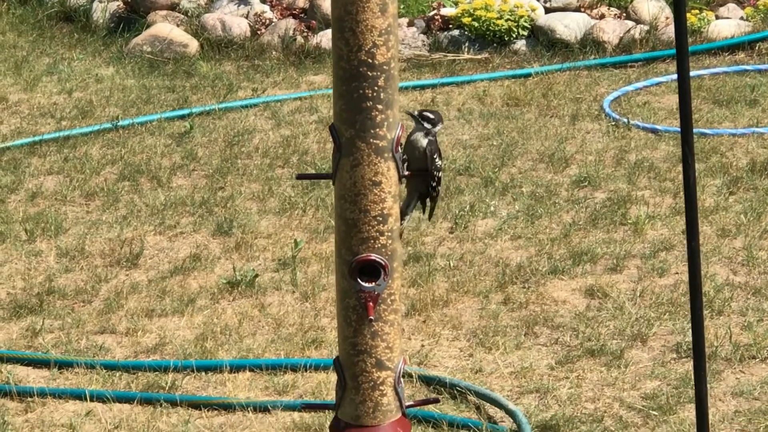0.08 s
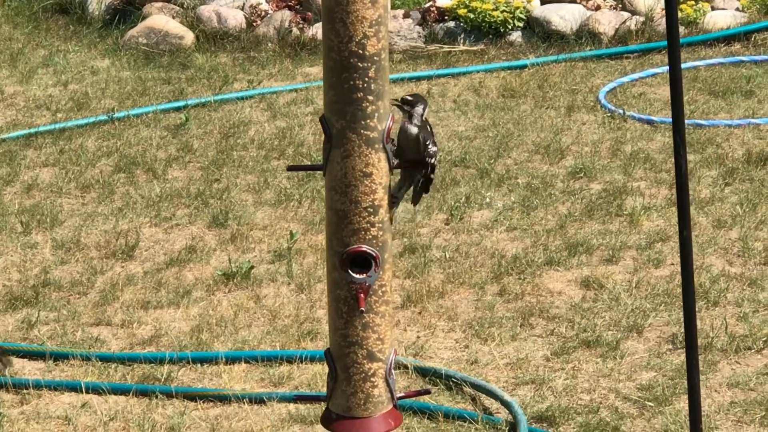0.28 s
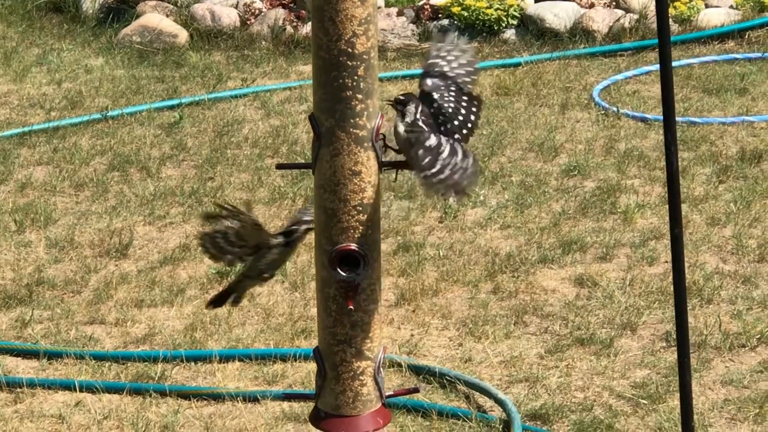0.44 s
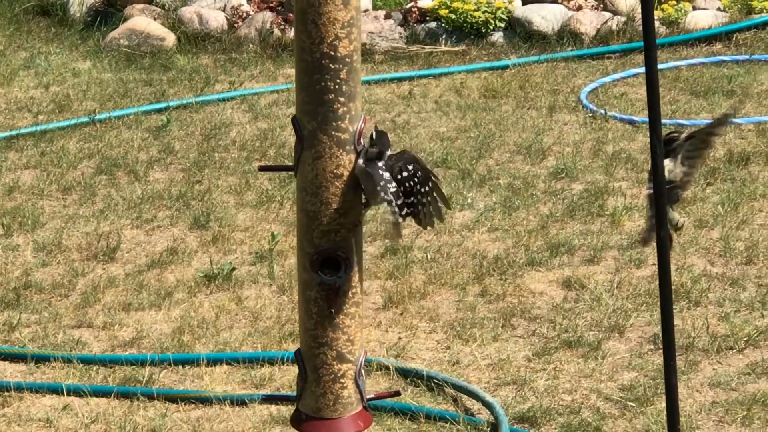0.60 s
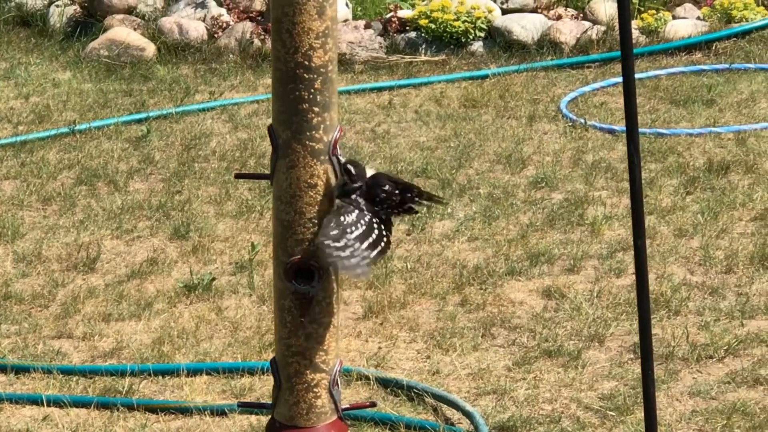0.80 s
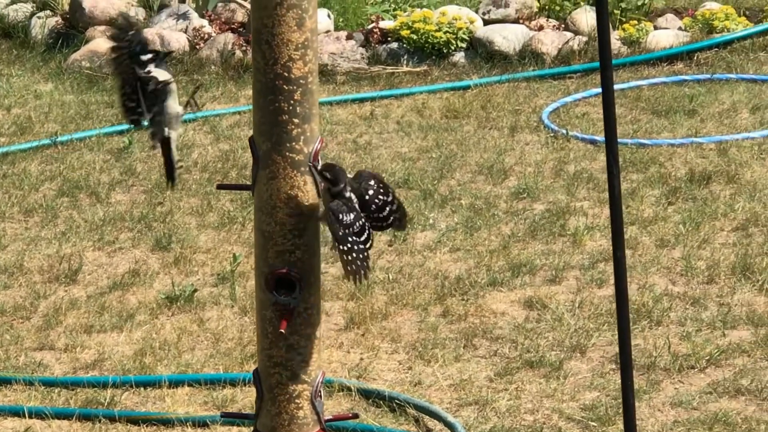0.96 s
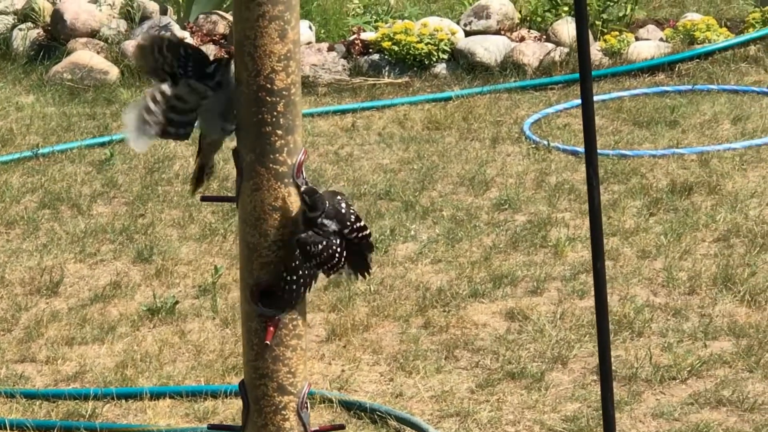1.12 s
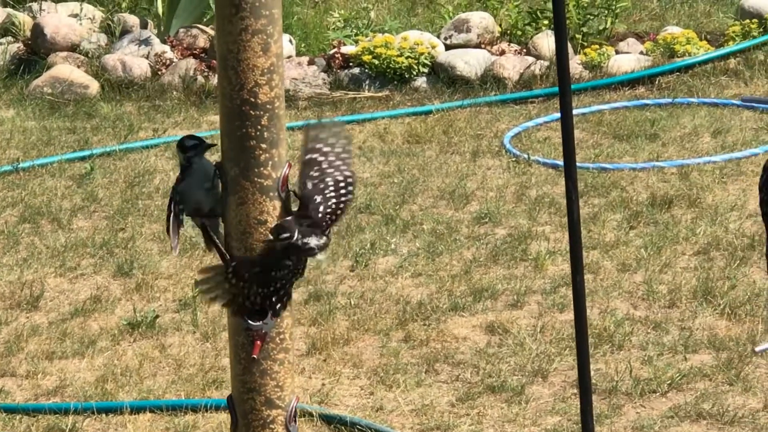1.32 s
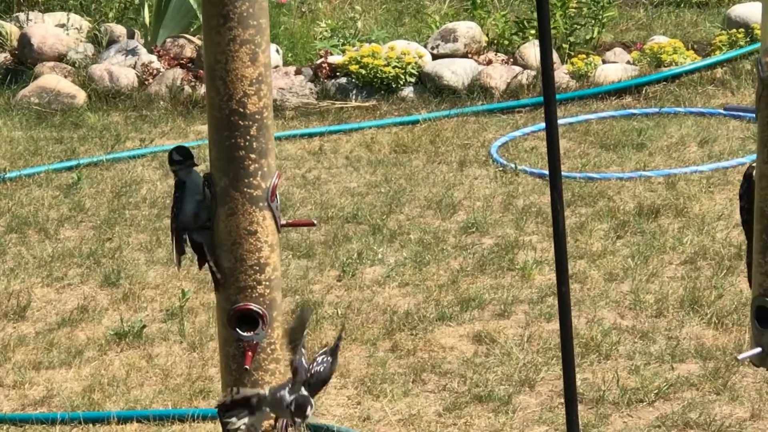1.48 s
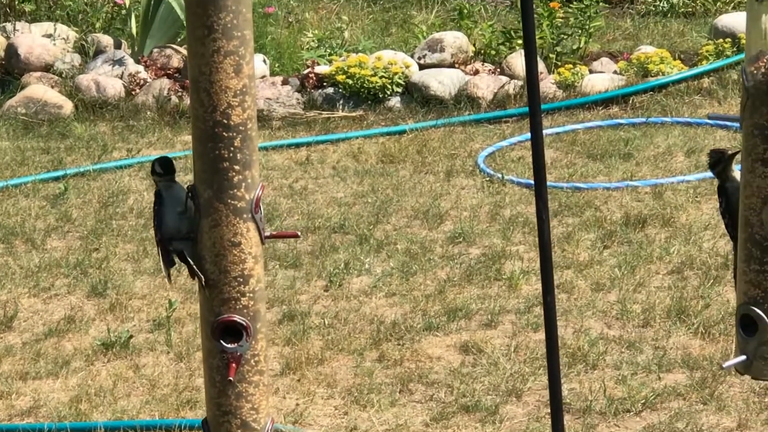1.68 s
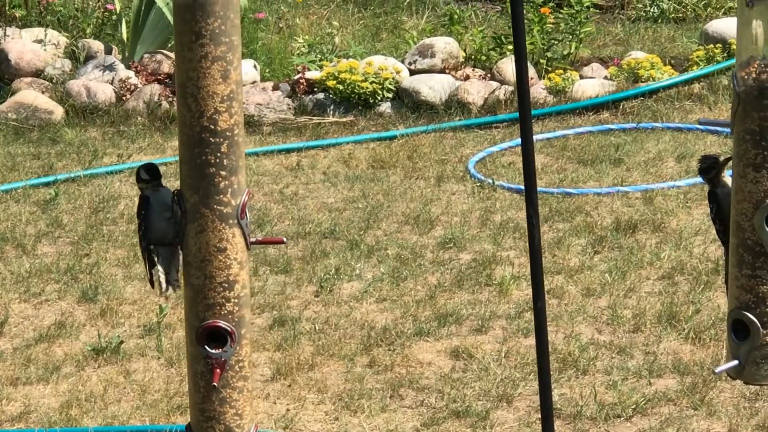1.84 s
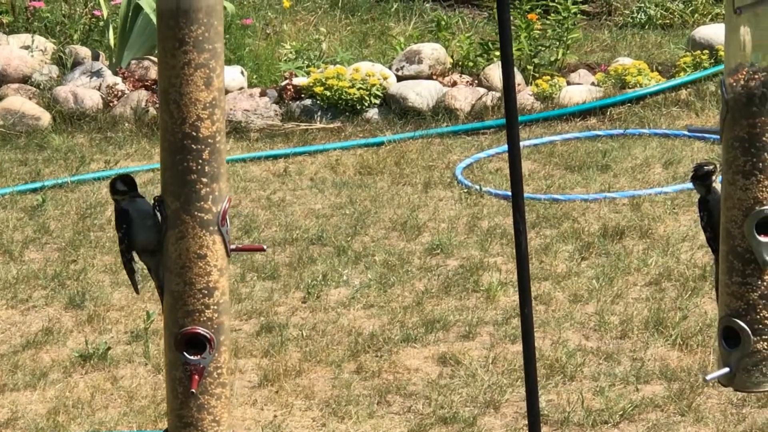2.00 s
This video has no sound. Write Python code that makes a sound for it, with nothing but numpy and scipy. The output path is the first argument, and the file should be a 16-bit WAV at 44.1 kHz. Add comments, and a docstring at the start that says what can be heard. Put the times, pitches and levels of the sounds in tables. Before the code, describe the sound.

Woodpeckers chirp close to the microphone: high, piercing squeaks, each a tiny pip or hoarse rasp turning into a clear note that drops away. Four come from 0.2 to 0.8 seconds, then five from 1.35 to 1.85, closer together near the end. Small bill clicks tick between. A songbird further off whistles a repeating phrase until about 1.4, then fainter birds, over quiet garden hiss.

```python
"""Young woodpeckers chirp close by at a garden feeder: a short pip, a hoarse rasp, then a clear note that drops away.
Pips and notes are harmonic stacks; rasps are shaped noise with wandering tones; fast slides and bill clicks join them.
A songbird further off repeats a phrase of short whistles, each a swept sine; a farther bird's sines are blurred.
Garden echoes are decaying noise tails; light outdoor hiss, a low hum and a blur of far birds lie behind."""
import sys
import numpy as np
from scipy import signal
from scipy.fft import rfft, irfft, next_fast_len
from scipy.io import wavfile
from scipy.ndimage import uniform_filter1d, map_coordinates

SR = 44100
rng = np.random.default_rng(int(sys.argv[2]) if len(sys.argv) > 2 else 0)


def volts_from_db(level):
    """Convert decibel levels to linear amplitude ratios."""
    exponent = np.asarray(level, float) / 20
    return 10 ** exponent


def file_out(sig):
    """Save sig as 16-bit WAV at sys.argv[1]."""
    # one column per channel
    cols = np.atleast_2d(sig).T
    # limit, then scale
    lim = np.clip(cols, -1, 1)
    pcm = np.round(lim * 32767).astype(np.int16)
    wavfile.write(sys.argv[1], SR, pcm)


N = 92610  # samples
ATTACK_S = 0.0008  # onset time constant of notes and pips
BEAK_HZ = 8500  # resonance of the beak
FLUTTER_HZ = 4100  # above this pitch the song flutters more and arrives less directly
BLUR_CENTRE_HZ = 5000  # centre of the far-bird blur and pivot of the foliage scatter


def unit(x):
    """Normalisation: scales a signal to an rms of 1."""
    return x / np.sqrt(np.mean(x ** 2) + 1e-20)


def wobble(n, rate):
    """Random modulation: a smooth curve through normal random knots, rate knots a second."""
    return map_coordinates(rng.standard_normal(int(n * rate / SR) + 4), [np.arange(n) * rate / SR])


def add(out, start_s, x):
    """Superposition: mixes x in at start_s seconds."""
    part = out[round(start_s * SR):][:len(x)]
    part += x[:len(part)]


def sine(pitch):
    """Phase integration: a sine of peak 1 that follows a pitch curve [Hz]."""
    return np.sin(2 * np.pi * np.cumsum(pitch) / SR)


def coloured(n, gain):
    """Spectral shaping: noise of rms 1 with a gain per frequency."""
    m = next_fast_len(n + 2048)
    spectrum = rfft(rng.standard_normal(m)) * gain(np.fft.rfftfreq(m, 1 / SR) + 1)
    return unit(irfft(spectrum, m)[:n])


def tract_loss_db(hz):
    """Source-filter principle: loss away from the beak resonance and below the throat's pass band."""
    beak_db = 8 * abs(np.log2(hz / BEAK_HZ))  # 8 dB per octave
    throat_db = 35 * np.maximum(np.log2(3100 / hz), 0)  # 35 dB per octave below 3100 Hz
    return beak_db + throat_db


def harmonic_stack(pitch, voice):
    """Harmonic series: six partials, each changing level as it slides along the tract's response."""
    one, three, four = voice
    high_step_db = 9  # loss per partial over the 4th
    levels = [one, 0, three, four, four - high_step_db, four - 2 * high_step_db]
    phase = 2 * np.pi * np.cumsum(pitch) / SR
    home = np.median(pitch)
    total = np.zeros(len(pitch))
    for k, db in enumerate(levels, 1):
        slide_db = tract_loss_db(k * home) - tract_loss_db(k * pitch)
        waver_db = 0.7 * wobble(len(pitch), 127)
        audible = k * pitch < SR / 2
        total += np.sqrt(2) * volts_from_db(db + slide_db + waver_db) * audible * np.sin(k * phase)
    return total


# unsteady tones inside a rasp: (multiple of the centre [ratio], level [dB])
STRANDS = [(1, 1.5), (.56, -7), (1.4, -11), (.8, -4.5)]


def hoarse_breath(n, hz0, hz1):
    """Turbulent noise: fluttering breath around a centre, with broken, wandering tones inside it."""
    width_octaves = 0.75
    middle = (hz0 + hz1) / 2
    sound = coloured(n, lambda f: np.exp(-abs(np.log2(f / middle) / width_octaves)))
    centre = np.linspace(hz0, hz1, n)
    for multiple, db in STRANDS:
        breaks = volts_from_db(db + 5 * wobble(n, 400))
        wander = 1 + 0.035 * wobble(n, 250)  # share of pitch
        sound += breaks * sine(multiple * centre * wander)
    return unit(sound) * volts_from_db(2 * wobble(n, 700))


# clear notes: (start [s], end [s], pitch [Hz], opening bend [Hz], sag [Hz/s], drop time [s],
# level of the 2nd partial at mid-note [dB])
NOTES = [(0.207, 0.241, 4110, 300, -1000, 0.0042, -37), (0.35, 0.39, 4180, -700, 9016, 0.0031, -36.5),
         (0.538, 0.575, 4000, -800, 509, 0.0038, -35), (0.7422, 0.771, 3953, -450, 3013, 0.0047, -49),
         (1.386, 1.4185, 3680, 600, 2000, 0.0055, -48.5), (1.5405, 1.5777, 3770, 900, 2496, 0.0048, -38),
         (1.6612, 1.688, 3830, 600, 3993, 0.0032, -38.5), (1.7468, 1.7755, 3590, 450, -2500, .0044, -38.5),
         (1.825, 1.8519, 3720, 500, 500, 0.0046, -40.5)]
# voice of each clear note: (1st, 3rd, 4th partial over the 2nd [dB], swell to the middle [dB])
VOICES = [(-7.5, -18.5, -50, 0), (-8, -14, -27, 1), (-8.5, -3.5, -23, 5.5), (4.5, 9, -4, 6),
          (-4.5, -4.5, -16, 3), (-9.5, -3, -15, 5.5), (-9, -6, -17, 3), (-9, -10, -24, 5),
          (-7.5, -10.5, -27, 0.5)]


def clear_notes():
    """Frequency modulation: a harmonic note that loses level and turns hoarse as its pitch drops."""
    from_below_s, from_above_s = 0.00291, 0.001  # time constants of the opening bend
    drop_hz, drop_db, hoarse_db = 1423, 12, -15
    gulp_hz, gulp_s, gulp_db = 2050, 0.006, -25  # a low blip closes each note
    out = np.zeros(N)
    for (start, end, hz, bend, sag, drop_s, db), (*voice, swell_db) in zip(NOTES, VOICES):
        length = end - start
        t = np.arange(round((length + 0.0084) * SR)) / SR
        drop = np.exp((t - length) / drop_s)  # reaches 1 at the listed end and grows on past it
        opening = bend * np.exp(-t / (from_below_s if bend < 0 else from_above_s))
        pitch = np.maximum(hz + opening - sag * t - drop_hz * drop, 1200)
        swell = volts_from_db(db - swell_db * (2 * t / length - 1) ** 2)
        level = (1 - np.exp(-t / ATTACK_S)) * swell
        tone = volts_from_db(-drop_db * drop) * harmonic_stack(pitch, voice)
        hoarse_level = volts_from_db(hoarse_db) * drop * np.exp(1 - drop)
        breath = hoarse_level * hoarse_breath(len(t), BEAK_HZ, BEAK_HZ)
        add(out, start, level * (tone + breath))
        n = round(gulp_s * SR)
        gulp = np.hanning(n) * np.sin(2 * np.pi * gulp_hz * t[:n])
        add(out, end, volts_from_db(db + gulp_db) * gulp)
    return out


# pips: (start [s], length [s], pitch [Hz], bend by the end [Hz], level of the 2nd partial [dB])
PIPS = [(0.183, 0.0043, 3240, -100, -48), (0.323, 0.0093, 3326, -450, -45.5),
        (0.509, 0.012, 3216, -300, -43.5), (1.353, 0.0065, 3290, 1102, -49.5),
        (1.516, 0.0058, 3140, -300, -48), (1.643, 0.006, 3130, -900, -51)]
# voice of the pips: (1st, 3rd, 4th partial over the 2nd [dB])
PIP_VOICE = (-10, -6, -12)


def pips():
    """Amplitude envelope: a brief harmonic stack with a sharp onset and a rounded close."""
    out = np.zeros(N)
    for start, length, hz, bend, db in PIPS:
        t = np.arange(round(length * SR)) / SR
        onset = 1 - np.exp(-t / ATTACK_S)
        close = np.cos(np.pi / 2 * t / length) ** 0.5
        pitch = hz + bend * (t / length) ** 2
        add(out, start, volts_from_db(db) * onset * close * harmonic_stack(pitch, PIP_VOICE))
    return out


# rasps: (start [s], end [s], centre at start [Hz], centre at end [Hz], start level [dB], end level [dB])
RASPS = [(0.184, 0.205, 7600, 8200, -54, -49), (0.331, .35, 7500, 8140, -52.5, -52),
         (0.516, 0.539, 7200, 8250, -52.5, -47.5), (0.714, 0.728, 6000, 5800, -63, -59),
         (.732, 0.741, 7800, 8160, -63, -54.5), (1.359, 1.382, 7130, 6700, -51, -51.5),
         (1.358, 1.383, 11500, 10530, -46.5, -56), (1.518, 1.543, 6480, 7460, -55, -48),
         (1.646, 1.661, 6720, 7300, -52, -46), (1.734, 1.747, 6930, 7500, -57, -44),
         (1.812, 1.824, 7100, 7100, -64, -58)]


def rasps():
    """Turbulent noise: short bursts of hoarse breath with gliding tones and level."""
    out = np.zeros(N)
    for start, end, hz0, hz1, db0, db1 in RASPS:
        n = round((end - start) * SR)
        level = volts_from_db(np.linspace(db0, db1, n)) * signal.windows.tukey(n, 0.15)
        add(out, start, level * hoarse_breath(n, hz0, hz1))
    return out


# fast falling slides, most leading into a clear note, and one soft falling pip:
# (start [s], length [s], from [Hz], to [Hz], level of the 2nd partial [dB])
SWOOPS = [(0.2, 0.008, 7230, 4170, -66.5), (0.535, 0.0063, 4240, 2970, -62), (.71, .018, 3480, 2950, -71),
          (1.381, 0.0068, 5500, 3900, -63), (1.537, .005, 5850, 3920, -66.5),
          (1.662, 0.006, 6340, 4000, -63.5), (1.741, 0.006, 6400, 3780, -67),
          (1.824, 0.0045, 5400, 3900, -69)]


def swoops():
    """Linear frequency sweep: falling harmonic slides, strongest in the 1st partial."""
    out = np.zeros(N)
    for start, length, hz0, hz1, db in SWOOPS:
        pitch = np.linspace(hz0, hz1, round(length * SR))
        add(out, start, volts_from_db(db) * np.hanning(len(pitch)) ** 0.5 * harmonic_stack(pitch, (12, -3, -12)))
    return out


# bill clicks: (time [s], level at onset [dB])
CLICKS = [(.517, -49), (.72, -49), (1.127, -59), (1.479, -52), (1.646, -46), (1.7305, -45), (1.810, -51)]


def bill_clicks():
    """Impulsive excitation: dry bursts of band-shaped noise that decay exponentially."""
    t60, centre_hz = 0.0051, 4000  # s, Hz
    t = np.arange(SR // 50) / SR
    out = np.zeros(N)
    for start, db in CLICKS:
        burst = coloured(len(t), lambda f: np.exp(-np.log2(f / centre_hz) ** 2 / 2))
        add(out, start, volts_from_db(db - 60 * t / t60) * burst)
    return out


# shapes of the song's notes: (time after note start [s], pitch [Hz], level [dB])
RISE = [(0, 3640, -66), (.012, 3700, -54), (.021, 3850, -50), (.03, 3900, -48), (.04, 4010, -49),
        (.052, 4520, -56), (.062, 4900, -54), (.075, 5000, -66)]
FALL = [(0, 4000, -66), (.009, 3990, -52), (.029, 3850, -48), (.045, 3610, -49), (.058, 3330, -55),
        (.072, 3240, -55), (.078, 3260, -63), (.13, 3280, -69)]
DIVE = [(0, 5400, -68), (.008, 5380, -59), (.016, 5200, -61), (.028, 4350, -61), (.034, 4080, -50),
        (.042, 3880, -47), (.052, 3740, -50), (.059, 3700, -68)]
HIGH = [(0, 5350, -70), (.012, 5500, -64), (.02, 5800, -60), (.04, 5930, -58), (.055, 5950, -61),
        (.064, 5940, -70), (.085, 5920, -58), (.108, 5940, -68)]
DIP = [(0, 5420, -68), (.009, 5400, -57), (.02, 4650, -59), (.035, 4290, -59), (.048, 4560, -57),
       (.06, 4850, -57), (.068, 4800, -64), (.085, 4750, -68)]
LIFT = [(0, 5350, -68), (.016, 5600, -61), (.038, 5680, -58), (.046, 5680, -70)]
# the song: (note shape, list of (start [s], gain [dB], sung for [s]))
SONG = [(RISE, [(.179, -3, .04), (.734, -1, .075), (1.298, -1, .075)]), (FALL, [(.285, -1, .065),
        (.857, -1, .13)]), (DIVE, [(.42, 0, .059), (.997, 0, .059)]), (LIFT, [(.487, -1, .046)]),
        (HIGH, [(1.06, -1, .108)]), (DIP, [(.042, -14, .085), (.601, 0, .085), (1.172, 0, .085)])]


def songbird():
    """Frequency modulation of a pure tone: whistles drawn from six shapes, most sung more than once."""
    out = np.zeros(N)
    for note, times in SONG:
        at, hz, db = np.transpose(note)
        for start, gain_db, length in times:
            t = np.arange(round(length * SR)) / SR
            pitch = uniform_filter1d(np.interp(t, at, hz), size=150)
            waver_db = 1 + 0.0025 * np.maximum(pitch - FLUTTER_HZ, 0)  # deeper at high pitch
            level = volts_from_db(np.interp(t, at, db) + gain_db + waver_db * wobble(len(t), 236))
            level = level * signal.windows.tukey(len(t), 0.1)
            add(out, start, np.sqrt(2) * level * sine(pitch))
    return out


# far bird: (start [s], length [s], pitch [Hz], slide [Hz/s], level before blurring [dB])
FAR = [(1.58, .06, 4200, -5000, -66), (1.69, .04, 4700, -3000, -64), (1.9, .05, 4700, -14000, -70),
       (2.02, .055, 5200, -12000, -65), (2.01, .09, 6100, 500, -68), (1.88, .08, 2250, 100, -74),
       (2.01, .08, 2250, 100, -75)]


def far_bird():
    """Random amplitude modulation: faint whistles smeared by distance."""
    out = np.zeros(N)
    for start, length, hz, slide, db in FAR:
        t = np.arange(round(length * SR)) / SR
        blur = wobble(len(t), 500)
        envelope = volts_from_db(db) * np.sqrt(2) * np.hanning(len(t)) ** 0.5
        add(out, start, envelope * blur * sine(hz + slide * t))
    return out


def garden_echo(x, t60, gap_s):
    """Diffuse reverberation: scatter from fences and bushes, drawn anew every twelfth of a second."""
    t, out, step = np.arange(SR // 2) / SR, np.zeros(N), SR // 12
    for i in range(0, N, step):
        build_up = 1 - np.exp(-(t / gap_s) ** 2)
        tail = rng.standard_normal(len(t)) * volts_from_db(-60 * t / t60) * build_up
        add(out, i / SR, signal.fftconvolve(x[i:i + step], tail / np.linalg.norm(tail)))
    return out


def near_field(near):
    """Superposed paths: direct sound, one delayed ground reflection and garden echoes."""
    ground = np.pad(near, (round(0.0034 * SR), 0))[:N]
    return near + volts_from_db(-12) * ground + volts_from_db(-17.5) * garden_echo(near, t60=0.33, gap_s=0.0041)


def through_foliage(song):
    """Frequency-dependent scattering: high notes scatter more and arrive less directly."""
    hz = np.clip(np.fft.rfftfreq(N, 1 / SR), 2000, 7000)
    scatter_db = 14 * np.log2(hz / BLUR_CENTRE_HZ)  # 14 dB per octave
    shade_db = 0.0012 * np.maximum(hz - FLUTTER_HZ, 0)  # 0.0012 dB per Hz
    bright = irfft(rfft(song) * volts_from_db(scatter_db), N)
    direct = irfft(rfft(song) * volts_from_db(-shade_db), N)
    echo = volts_from_db(-8) * garden_echo(song, t60=0.45, gap_s=0.012)
    leaves = volts_from_db(-3) * garden_echo(bright, t60=0.1, gap_s=0.003)  # quick scatter
    return direct + echo + leaves


# blur of far birds: (time [s], level [dB])
CHATTER = [(0, -108), (.4, -68), (.8, -65.5), (1.2, -84), (1.6, -69), (2.1, -69)]


def far_chatter():
    """Band-shaped noise: many far birds merge into a blur that swells and fades."""
    width_octaves = 0.4
    blur = coloured(N, lambda f: np.exp(-(np.log2(f / BLUR_CENTRE_HZ) / width_octaves) ** 2))
    level_db = np.interp(np.arange(N) / SR, *np.transpose(CHATTER))
    return volts_from_db(level_db + 2.6 * wobble(N, 4.92)) * blur


# spectrum of the outdoor hiss: (frequency [Hz], relative density [dB per Hz])
AIR = [(15, -26), (25, -37), (40, -7), (60, 0.8), (120, -6.5), (250, -7), (500, -14), (1000, -15),
       (2100, -13), (2800, -17.5), (3500, -13), (5500, -12), (8500, -19), (12000, -20.5), (16000, -24),
       (17000, -60)]


def outdoor_hiss():
    """Stationary noise shaping: distant traffic, leaves and microphone hiss as one wavering noise."""
    hz, db = np.transpose(AIR)
    noise = coloured(N, lambda f: volts_from_db(np.interp(np.log(f), np.log(hz), db)))
    return volts_from_db(-64.5 + 1.14 * wobble(N, 3.17)) * noise


def low_hum():
    """Slow amplitude modulation: a low sine of steady pitch and wavering level."""
    tone = np.sin(2 * np.pi * 58.6 * np.arange(N) / SR)
    return volts_from_db(-86 + 3.2 * wobble(N, 2.7)) * tone


def scene():
    """Superposition: woodpeckers in front, songbirds further off, outdoor air behind."""
    woodpeckers = clear_notes() + pips() + rasps() + swoops() + bill_clicks()
    song = songbird() + far_bird()
    background = far_chatter() + outdoor_hiss() + low_hum()
    mix = near_field(woodpeckers) + through_foliage(song) + background
    return mix[None]


def band_limit(x):
    """A steep low-pass at the top of the band."""
    return signal.sosfilt(signal.butter(12, 16250, fs=SR, output="sos"), x)


def record(dry):
    """Band limitation: only frequencies below 15.9 kHz are kept."""
    passed = np.fft.rfftfreq(N, 1 / SR) < 15900
    kept = irfft(rfft(dry) * passed, N)
    return band_limit(kept)


dry = scene()
out = record(dry)
file_out(out)
```